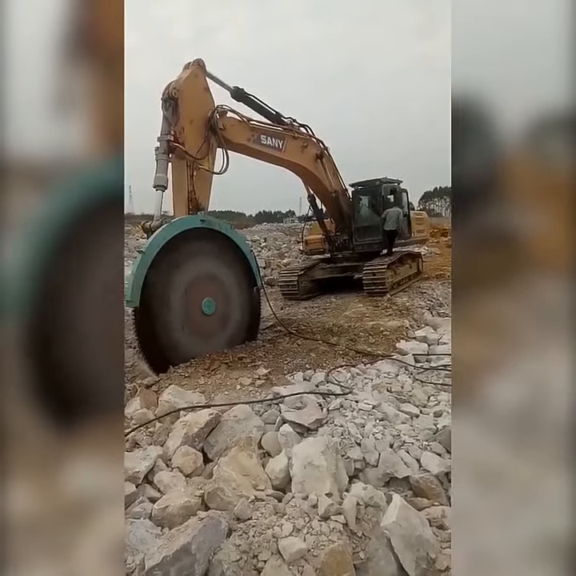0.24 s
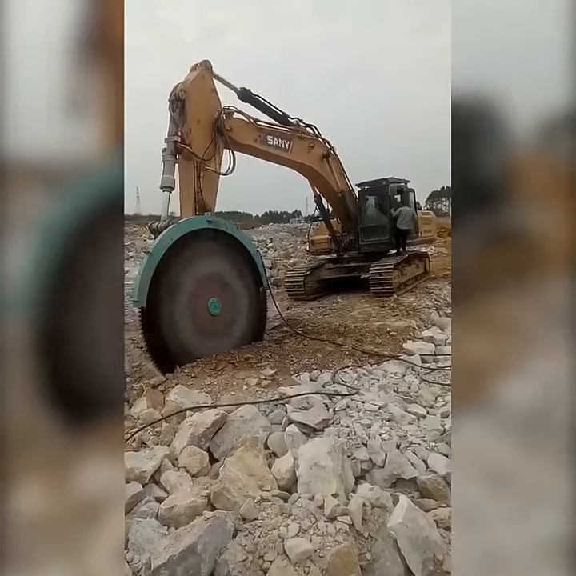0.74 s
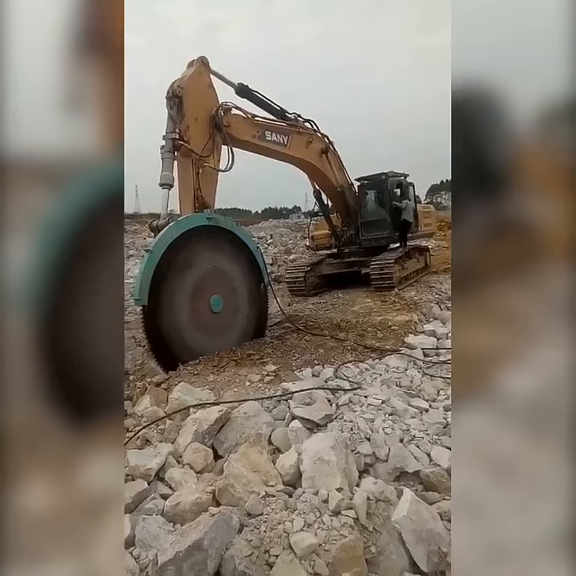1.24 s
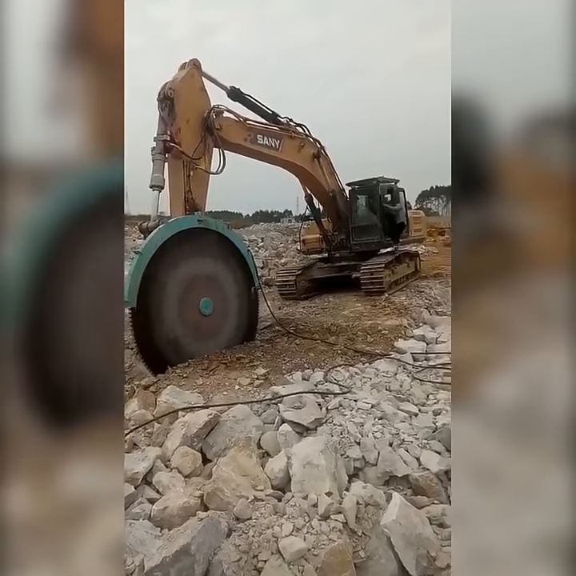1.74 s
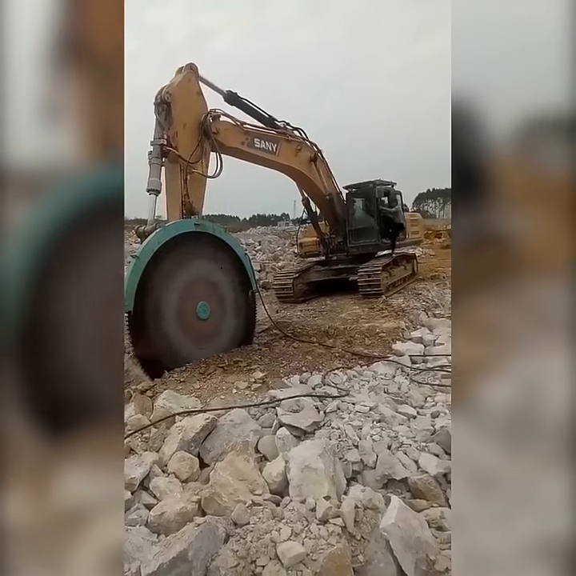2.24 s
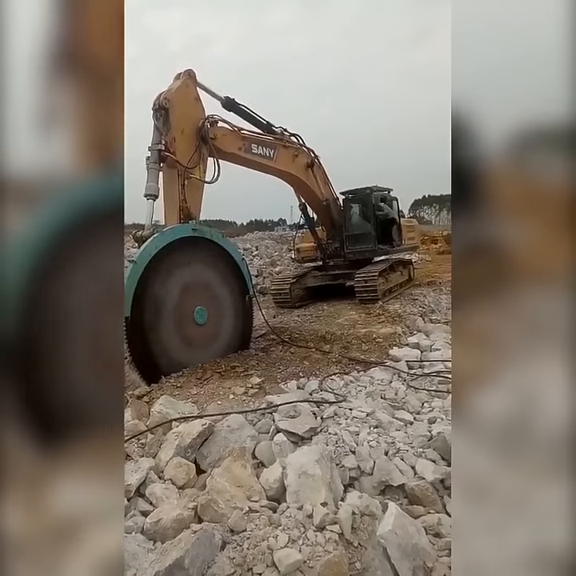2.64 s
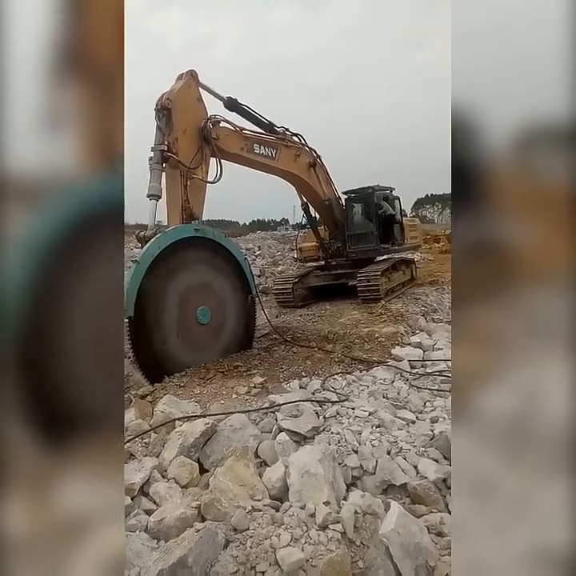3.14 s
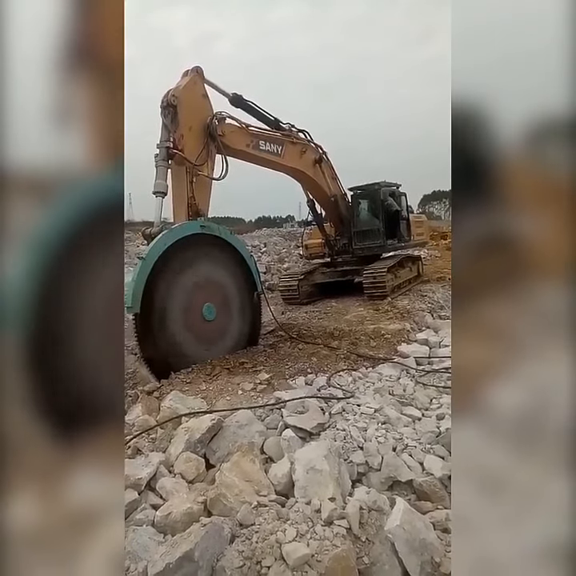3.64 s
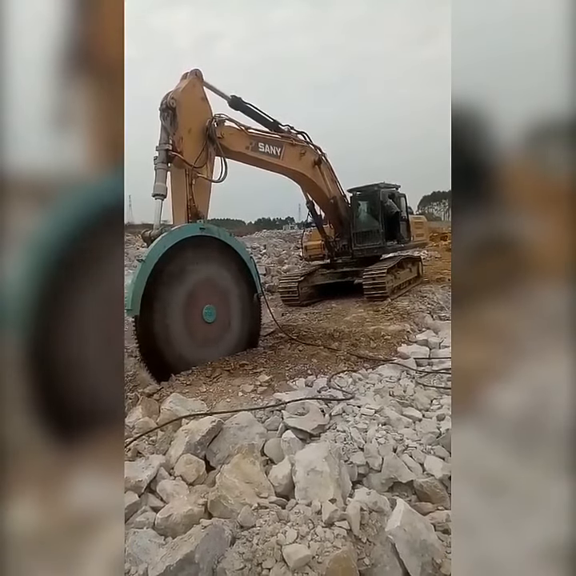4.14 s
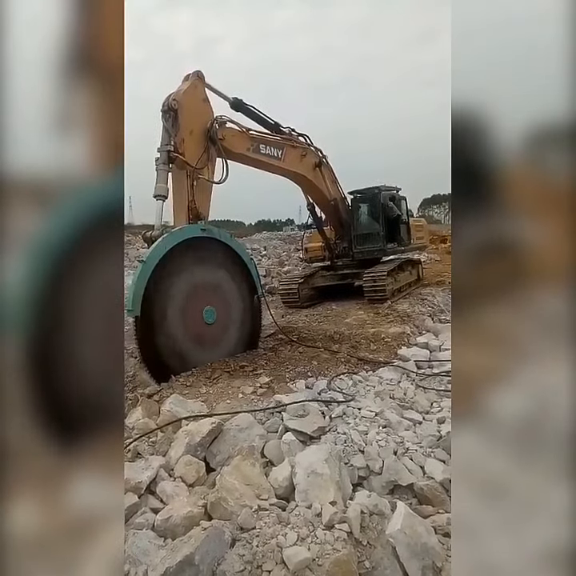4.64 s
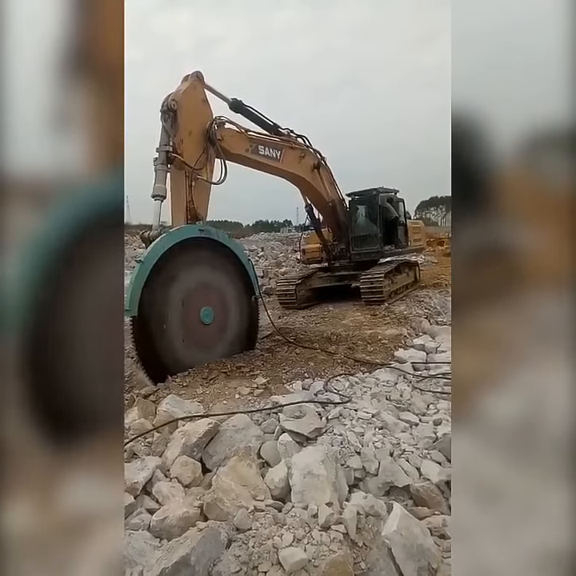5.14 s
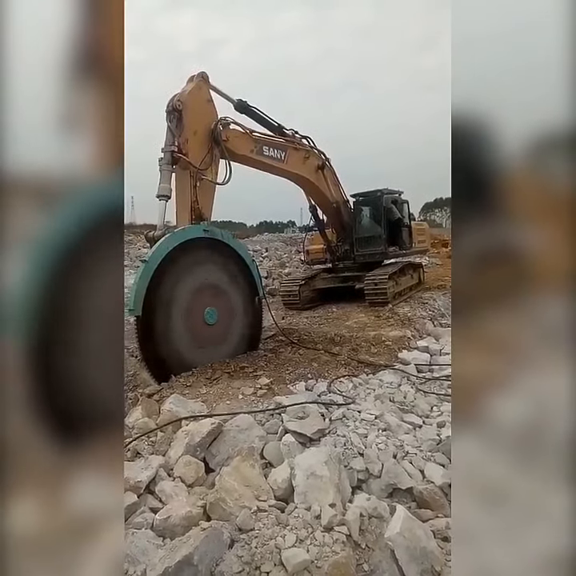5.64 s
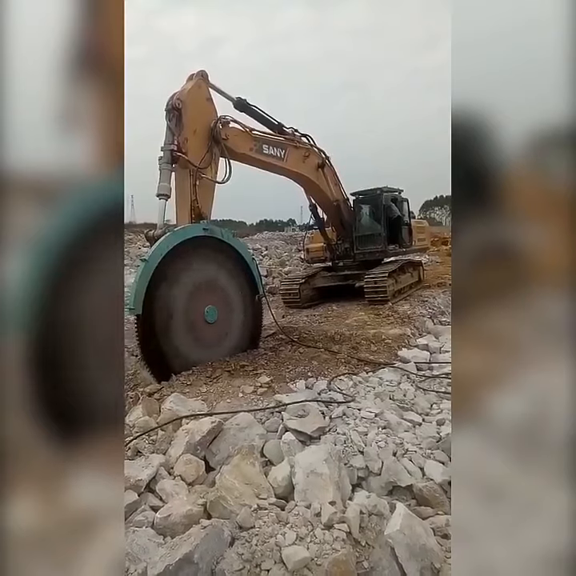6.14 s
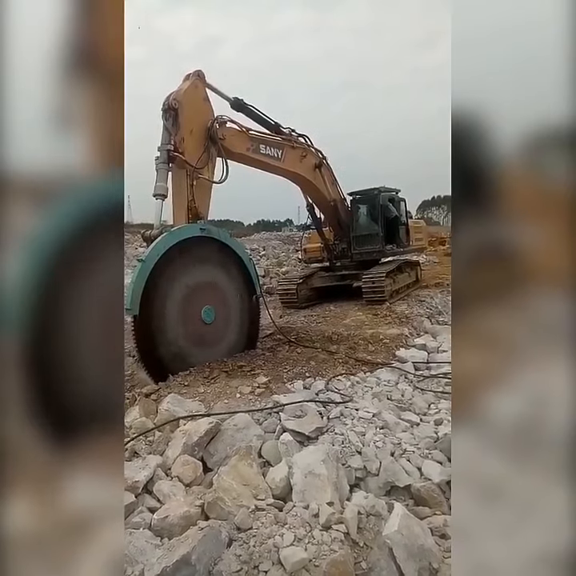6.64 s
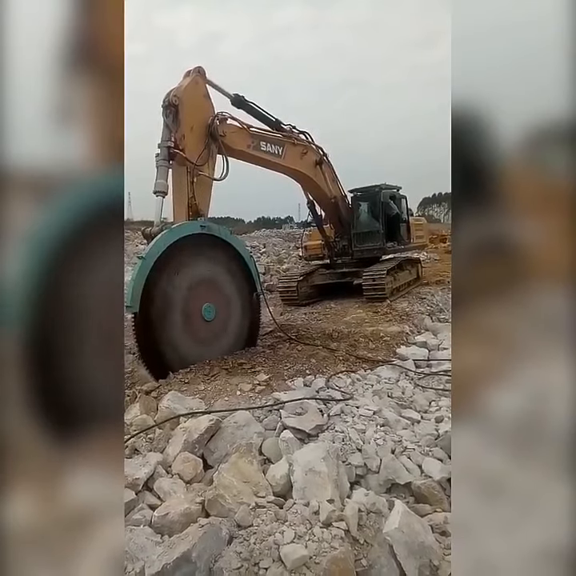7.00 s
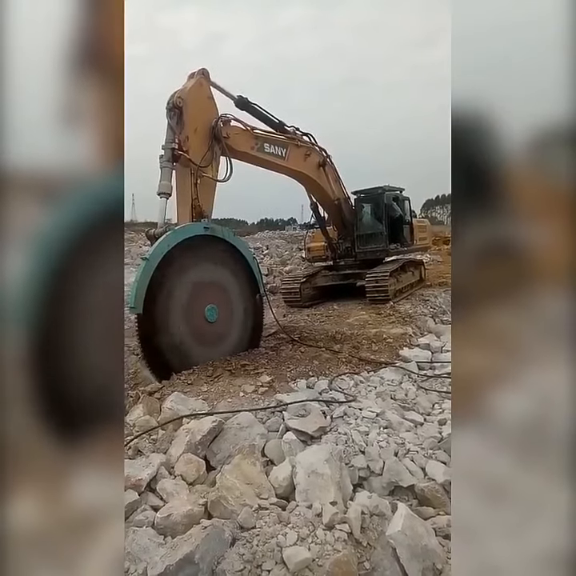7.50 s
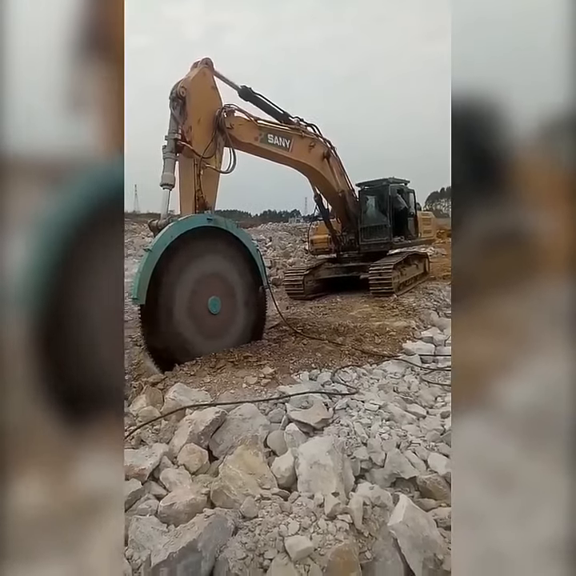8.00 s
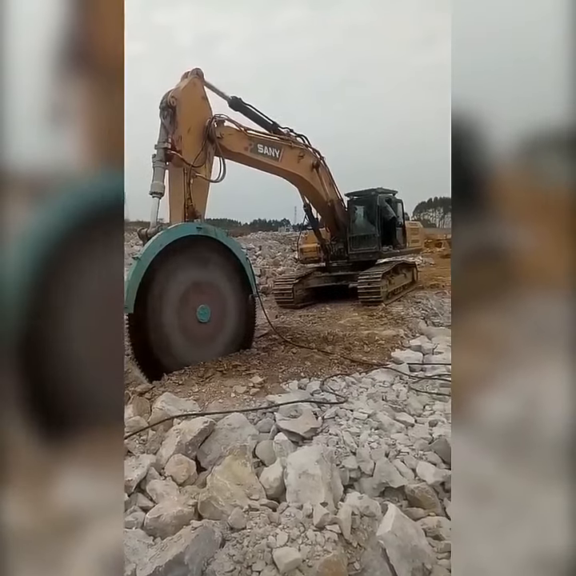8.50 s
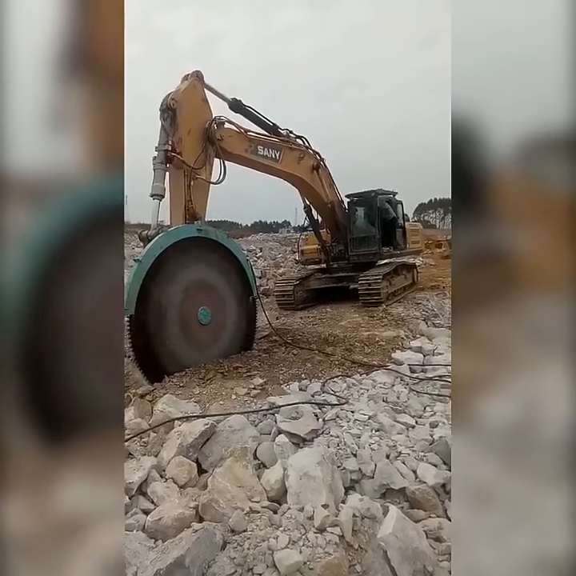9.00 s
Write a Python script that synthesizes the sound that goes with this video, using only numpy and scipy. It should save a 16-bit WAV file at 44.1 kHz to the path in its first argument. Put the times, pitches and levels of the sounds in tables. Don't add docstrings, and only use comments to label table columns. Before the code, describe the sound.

Harsh, high ringing of a big steel stone-cutting disc, chattering in a repeating rhythm, with gritty hiss and engine rumble underneath, loud and overloaded.

```python
import sys
import numpy as np
from scipy import signal
from scipy.fft import rfft, irfft, next_fast_len
from scipy.io import wavfile
from scipy.ndimage import uniform_filter1d

SR = 44100
rng = np.random.default_rng(int(sys.argv[2]) if len(sys.argv) > 2 else 0)


def unload_audio(sound):
    columns = np.transpose(np.atleast_2d(sound))
    steps = np.round(np.clip(columns, -1, 1) * 32767)
    wavfile.write(sys.argv[1], SR, steps.astype(np.int16))


def undo_db(level):
    steps = np.asarray(level, float) / 20
    return 10 ** steps


N = 408366
TIME = np.arange(N) / SR
BINS_HZ = np.maximum(np.fft.rfftfreq(N, 1 / SR), 1)
TURN_S, FIRST_TURN_S = 12637 / 44100, .1635
MEAN_FEED_DB = -10

# time in seconds, disc ring in dB, ring tilt in dB.
FEED = [(0.08, -15, -2), (0.59, -14, -2.1), (0.88, -14, 4), (1.17, -11.5, 2.5), (1.74, -11.5, 2.5),
        (2.03, -9.5, 3.5), (2.6, -8.5, 0.5), (3.17, -9.5, -0.4), (3.75, -9, -0.3), (4.32, -7, 0.2),
        (4.75, -9, 2), (5.46, -10, -0.3), (6.04, -9.5, -1.8), (6.9, -8, -1.2), (7.62, -9, -2.5),
        (8.19, -10.5, -1.8), (8.9, -11.5, -4), (9.15, -11, -2.5)]
GRIND_EDGES_HZ = [1850, 2540, 3050, 3950, 5150]


def rms_one(x):
    return x / np.sqrt(np.mean(x ** 2))


def along(rows, at, log=False):
    key, *columns = np.transpose(rows)
    if log:
        key, at = np.log(key), np.log(at)
    return [np.interp(at, key, column) for column in columns]


def drift(rate_hz):
    knots = rng.standard_normal(int(N / SR * 60) + 2)
    return np.interp(TIME * np.clip(rate_hz, .1, 60), np.arange(len(knots)), knots)


def ring_lean(hz):
    return np.clip((hz - GRIND_EDGES_HZ[1]) / 300, -1, 1)


def feed():
    disc_db, ring_tilt_db = along(FEED, TIME)
    swing = disc_db - MEAN_FEED_DB
    high_db = -21.5 + 0.36 * swing
    low_db = -30.5 + 0.26 * swing
    high_tilt_db = -0.55 + .6 * swing
    return disc_db, high_db, low_db, ring_tilt_db, high_tilt_db


def runout():
    # seconds into the turn, depth of bite in dB.
    bite_depth = [
        (0, 0),
        (.027, -4.2),
        (.035, 3.6),
        (.061, 3.8),
        (.085, 2.2),
        (.1, 5),
        (.16, 5),
        (.225, -0.5),
        (.2866, -2),
    ]
    trail_s, trail_width_s, trail_follows = .14, .05, .5
    into = (TIME - FIRST_TURN_S) % TURN_S
    trail = np.exp(-((into - trail_s) / trail_width_s) ** 2)
    disc = along(bite_depth, into)[0] + trail_follows * trail * (feed()[0] - MEAN_FEED_DB)
    once_db, once_s = 1.3, 0.15
    twice_db, twice_s = 1.47, 0.017
    angle = 2 * np.pi * (TIME - FIRST_TURN_S) / TURN_S
    once = once_db * np.cos(angle - 2 * np.pi * once_s / TURN_S)
    twice = twice_db * np.cos(2 * (angle - 2 * np.pi * twice_s / TURN_S))
    return disc, .25 * disc, once + twice


def bites(rise_s, spread_db, slip_rad, wander_rad):
    # seconds into the turn, ring in Hz, level at mid cut in dB, wear in dB per second.
    tooth_rows = [(.006, 2266, 2.5, -1.1), (.032, 2300, 12.5, 0.4), (.035, 2620, 7, -0.2),
                  (.043, 2570, 22, .1), (.053, 2447, 12.5, -1.5), (.058, 2662, 13.5, 0.54),
                  (.0663, 2508, 12.5, -1.25), (.0805, 2325, 7.5, 0.7), (.082, 2550, 14.5, -1.1),
                  (.092, 2275, 0, -1), (0.0989, 2492, 11.5, -1.8), (.106, 2561, 11, -1.5),
                  (0.1158, 2520, 15, 0.94), (0.1272, 2564, 13, -0.55), (.139, 2236, 5, 2),
                  (0.1402, 2577, 3, 0.3), (0.1465, 2585, 12, 0.45), (.151, 2308, 10, 0.7),
                  (0.1629, 2340, -4, 1.14), (0.1626, 2634, 2, -0.8), (.176, 2523, 2.5, -0.5),
                  (.186, 2480, 9, -1), (.191, 2722, 2, -0.7), (.199, 2600, 3, 0.7), (.215, 2570, 6, -2.2),
                  (.221, 2760, 3, 0.8), (0.2364, 2466, -2.5, 2), (.2525, 2174, -0.5, 1),
                  (.277, 2244, 5.5, -1.1), (0.2815, 2510, 6.5, -1.2)]
    mid_cut_s = 4.6
    tilt_share = 0.56
    turns = np.arange(-1, 33)
    t = np.arange(1200) / SR
    swell = t / rise_s * np.exp(1 - t / rise_s)
    out = np.zeros((2, N + 2 * SR))
    for s, hz, level_db, wear_db in tooth_rows:
        chance = rng.standard_normal((5, len(turns)))
        at = FIRST_TURN_S + turns * TURN_S + s - rise_s
        lean_db = tilt_share * ring_lean(hz) * along(FEED, at)[1]
        worn_db = level_db + wear_db * (at - mid_cut_s)
        size = undo_db(worn_db + lean_db + spread_db * chance[0])
        starts = ((at + 1) * SR).astype(int)
        for path in range(2):
            slip = slip_rad * chance[1 + path]
            wander = wander_rad * np.cumsum(chance[3 + path])
            phase = rng.uniform(0, 2 * np.pi) + slip + wander
            rings = size[:, None] * swell * np.sin(2 * np.pi * hz * t + phase[:, None])
            for start, ring in zip(starts, rings):
                out[path, start:start + len(t)] += ring
    return rms_one(out[:, SR:SR + N])


def rim_noise(same, lasting):
    size = round(TURN_S * SR)
    wear = rng.standard_normal((2, 60, size))
    rim = signal.lfilter([np.sqrt(1 - lasting ** 2)], [1, -lasting], wear, axis=1)
    rim = rim[:, 20:].reshape(2, -1)[:, :N]
    return np.sqrt(same) * rim + np.sqrt(1 - same) * rng.standard_normal((2, N))


def disc_modes(white, tilt_db):
    # pitch in Hz, width in Hz, level in dB.
    mode_rows = [(2090, 11, -6.5), (2092, 30, -17), (2212, 13.6, -9.5), (2365, 12.7, -3.5),
                 (2408, 19.5, -2), (2507.5, 46.4, 0.5), (2577, 13.4, -5.5), (2450, 9.8, -9),
                 (2693, 17, -0.5), (2746, 14.6, -4), (3060, 4.7, -46), (3680, 48, -26), (4390, 4.7, -11.5),
                 (4566, 42, -17.5)]
    out = 0
    for k, (hz, width_hz, level_db) in enumerate(mode_rows):
        r = np.exp(-np.pi * max(width_hz, 3) / SR)
        mode = signal.lfilter([1, 0, -1], [1, -2 * r * np.cos(2 * np.pi * hz / SR), r * r], white)
        level = undo_db(level_db + ring_lean(hz) * tilt_db)
        out = out + (-1) ** k * level * (1 - r * r) * mode
    return rms_one(out)


def grind(disc_db, high_db, low_db, ring_tilt_db, high_tilt_db, patchy_db):
    # frequency in Hz, level in dB per Hz.
    hiss_colour = [(600, -38), (760, -22), (1200, -11), (1500, -6), (1830, -7.5), (2000, 3), (2600, 18),
                   (2930, 9), (3100, -1.5), (4550, 2.5), (5050, -14), (5800, -23), (9000, -36),
                   (15500, -46)]
    white = rim_noise(same=.7, lasting=.93)
    hiss = rfft(white) * undo_db(along(hiss_colour, BINS_HZ, log=True)[0])
    band = np.searchsorted(GRIND_EDGES_HZ, BINS_HZ)
    low, under, over, mid, high, air = [irfft(hiss * (band == k), N) for k in range(6)]
    disc, upper, top = runout()

    ring = undo_db(-.7 * ring_tilt_db) * under + undo_db(1.0 * ring_tilt_db) * over
    mid = undo_db(upper - high_tilt_db / 2 + patchy_db * drift(25)) * mid
    high = undo_db(top + high_tilt_db / 2 + patchy_db * drift(25)) * high
    bright = mid + high + undo_db(patchy_db * drift(10)) * air
    modes = disc_modes(white * undo_db(0.99 * disc), ring_tilt_db)

    low_part = undo_db(low_db + patchy_db * drift(20)) * rms_one(low)
    bright_part = undo_db(high_db - 0.44) * rms_one(bright)
    ring_part = undo_db(disc_db - 5.5 + 0.8 * disc + patchy_db * drift(40)) * rms_one(ring)
    return low_part + bright_part + ring_part + undo_db(disc_db - 4.5) * modes


def engine():
    # frequency in Hz, level in dB per Hz.
    drone_colour = [(12, -58), (20, -22), (48, -18), (127, -4.5), (142, -5.5), (182, -9), (215, -2),
                    (259, -1.5), (289, -5), (348, -1), (466, -5.5), (503, -9), (536, -10), (615, -18.5),
                    (800, -21.5), (1040, -49), (1760, -120)]
    # pitch in Hz, level in dB.
    hum_orders = [(134.6, -47), (226.1, -43.5), (269.2, -43.5), (312.2, -46.5), (543.7, -51.5),
                  (25, -62.5), (76, -60), (150, -52.5), (163, -57)]
    drone_db, unsteady_db, unsteady_hz = -33, 1.3, 1.506
    bass_loss = np.sqrt(1 + (66 / BINS_HZ) ** 4)
    colour = undo_db(along(drone_colour, BINS_HZ, log=True)[0]) / bass_loss
    rumble = rms_one(irfft(rfft(rng.standard_normal((2, N))) * colour, N))
    rumble = undo_db(drone_db + 2.5 + 0.59 * drift(7.5)) * rumble
    for hz, level_db in hum_orders:
        phase = 2 * np.pi * np.cumsum(hz + unsteady_hz * drift(4)) / SR
        rumble = rumble + undo_db(level_db + 5.0 + unsteady_db * drift(3)) * np.sin(phase)
    return rumble


def scene():
    # frequency in Hz, level in dB, likeness 0-1, phase in radians.
    shade_rows = [(30, -7, .6, 0), (90, -7.5, .94, -.1), (260, -10, .97, -.3), (500, -11, .8, 0.1),
                  (750, 0.1, .5, -.7), (1150, -9, .68, -3.0), (1550, -13, .6, -.7), (1900, -10, .3, -.2),
                  (2200, -12, .8, -1.8), (2500, -25, .6, -2.4), (2680, -27, .6, -1.75),
                  (3050, -13, .3, -1.5), (4400, -21, .25, -2.5), (6000, -20, .05, -2.5),
                  (11000, -40, .05, -2.5)]
    disc_db, *controls = feed()
    rings = bites(rise_s=.0024, spread_db=1.3, slip_rad=.2, wander_rad=.17)
    teeth = undo_db(disc_db - 2.5 + .12 * (disc_db - MEAN_FEED_DB)) * rings
    direct, other = rfft(teeth + grind(disc_db, *controls, patchy_db=2.0) + engine())
    shade_db, alike, phase = along(shade_rows, BINS_HZ, log=True)
    alike = np.clip(alike, 0, 1)
    shared = alike * np.exp(1j * phase) * direct
    right = undo_db(shade_db) * (shared + np.sqrt(1 - alike ** 2) * other)
    return irfft(np.array([direct, right]), N)


def thinned(x, uneven_db):
    # frequency in Hz, level in dB under the whole frame.
    faintest = [(4400, -78), (5100, -65.5), (5400, -50.5), (6100, -54.5), (6500, -64), (9000, -59),
                (11500, -59), (14500, -67), (15500, -58)]
    hz, _, lines = signal.stft(x, SR, window="cosine", nperseg=2048, noverlap=1024)
    whole = np.sqrt(np.sum(np.abs(lines) ** 2, axis=1, keepdims=True))
    uneven = rms_one(uniform_filter1d(rng.standard_normal((2, 65, lines.shape[2])), size=2))
    uneven = uneven[:, np.arange(len(hz)) // 16]
    floor_db = along(faintest, hz + 1, log=True)[0][:, None]
    least = whole * undo_db(floor_db + uneven_db * uneven)
    kept = lines * (np.abs(lines) > least)
    return signal.istft(kept, SR, window="cosine", noverlap=1024)[1][:, :N]


def low_pass(x):
    return signal.sosfilt(signal.butter(12, 15680, fs=SR, output="sos"), x)


def record(dry):
    ceiling, softness = 1.5, 4.0
    envelope = np.abs(signal.hilbert(dry, next_fast_len(N))[:, :N])
    swing = uniform_filter1d(envelope, size=24)
    limited = dry / (1 + (swing / ceiling) ** softness) ** (1 / softness)
    ragged_db = 0.48
    top = 0.958 * undo_db(ragged_db * rng.standard_normal(dry.shape))
    clipped = np.clip(limited, -top, top)
    return low_pass(thinned(clipped, uneven_db=3.5))


dry = scene()
out = record(dry)
unload_audio(out)
```